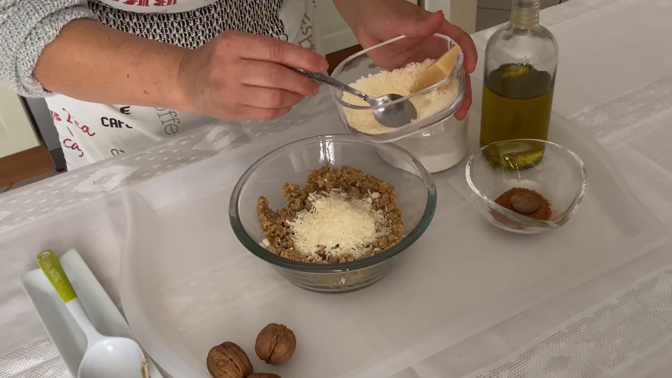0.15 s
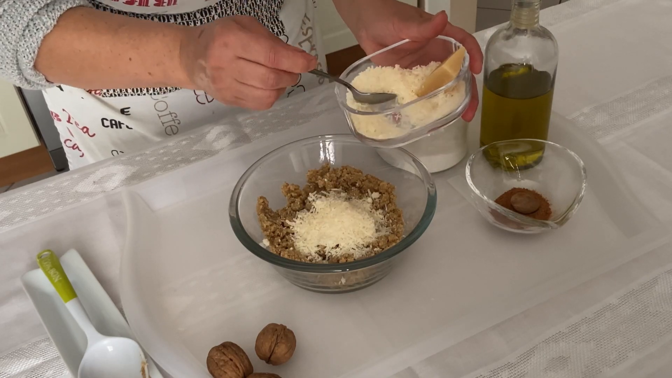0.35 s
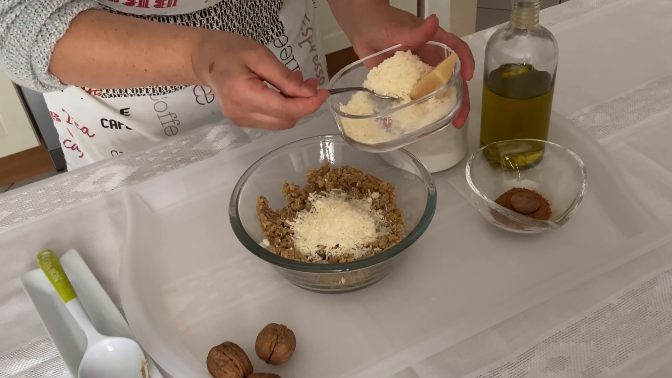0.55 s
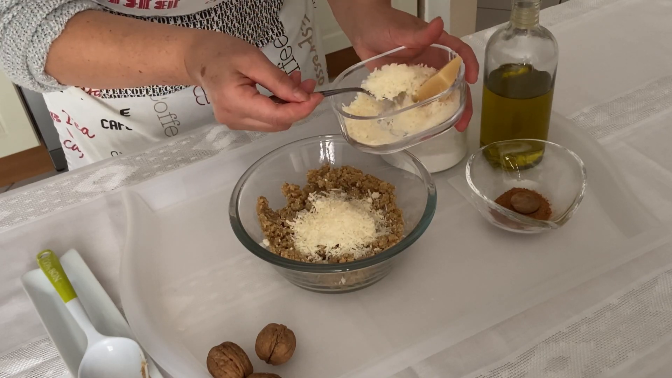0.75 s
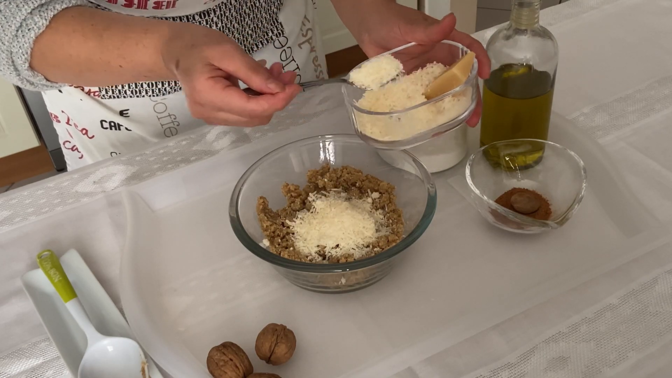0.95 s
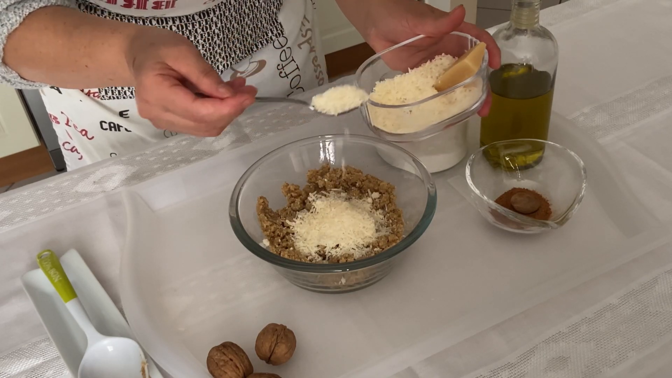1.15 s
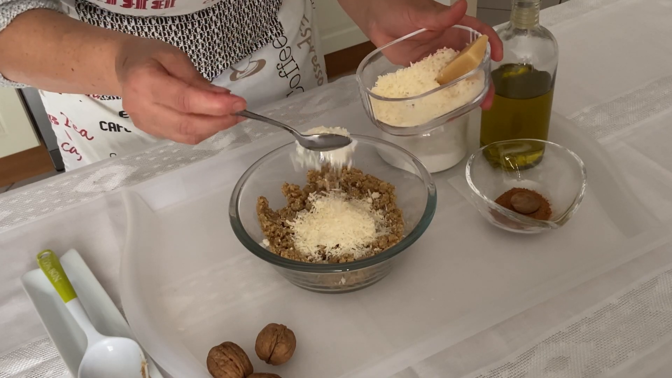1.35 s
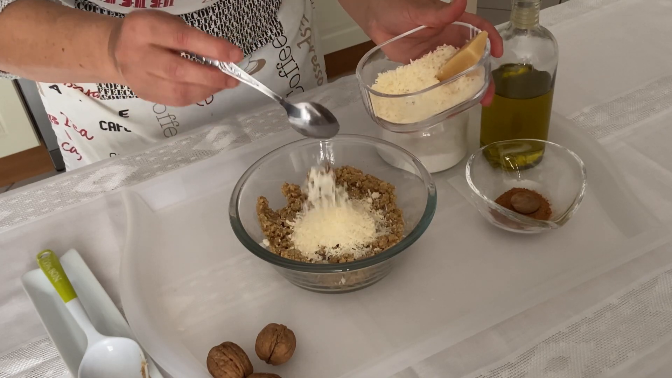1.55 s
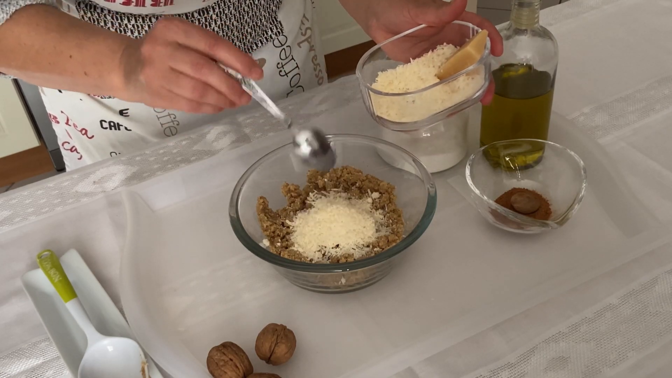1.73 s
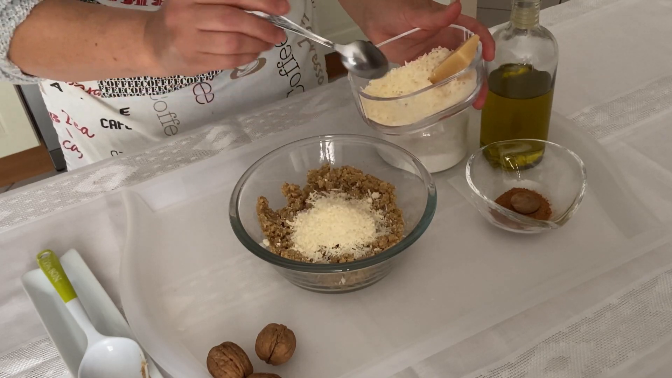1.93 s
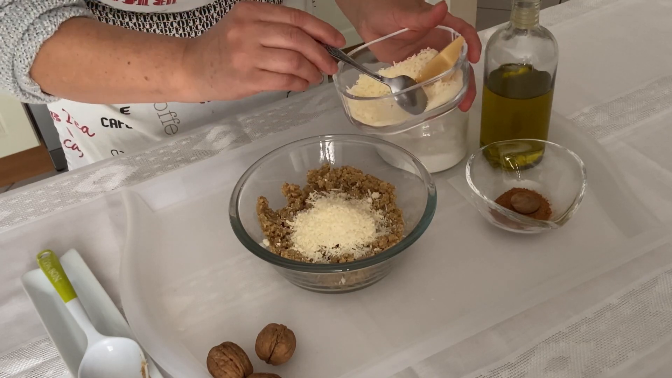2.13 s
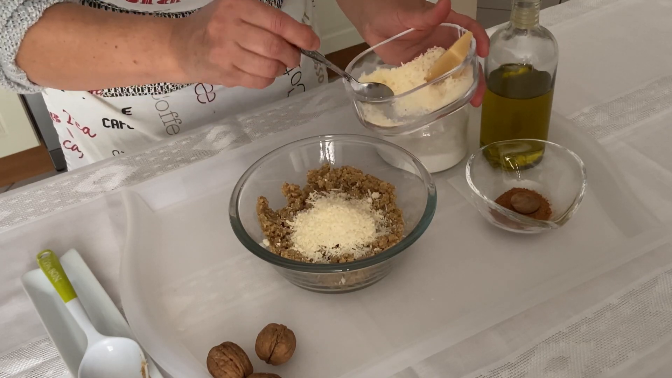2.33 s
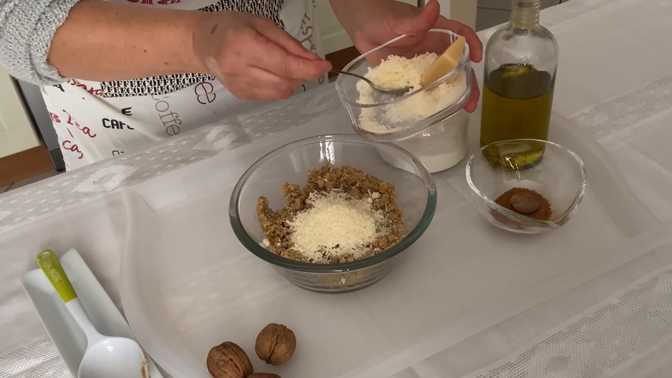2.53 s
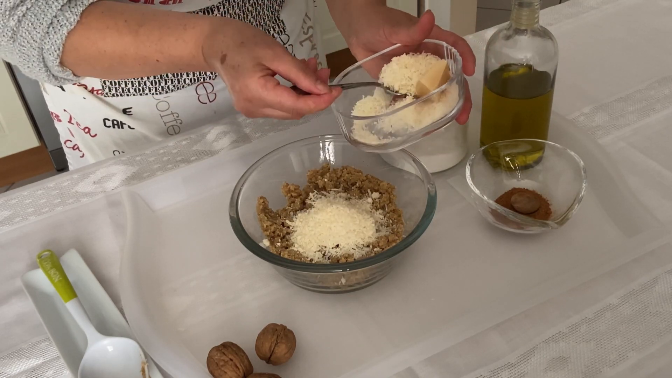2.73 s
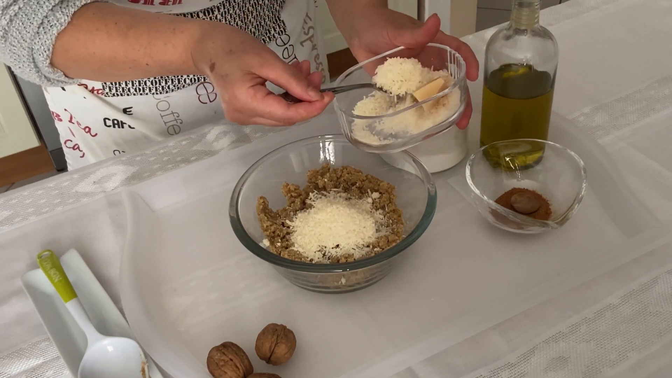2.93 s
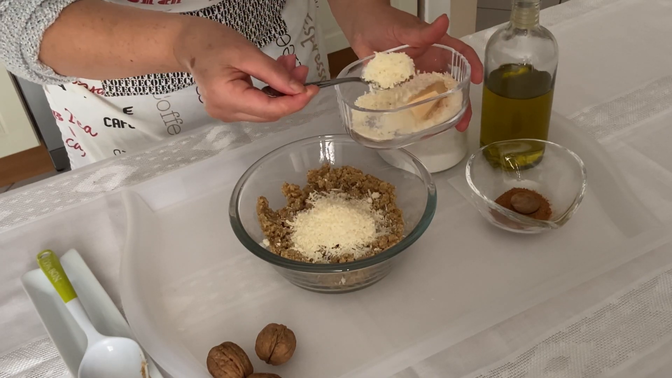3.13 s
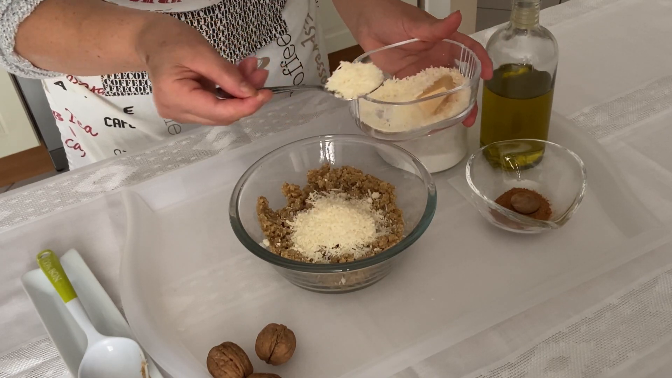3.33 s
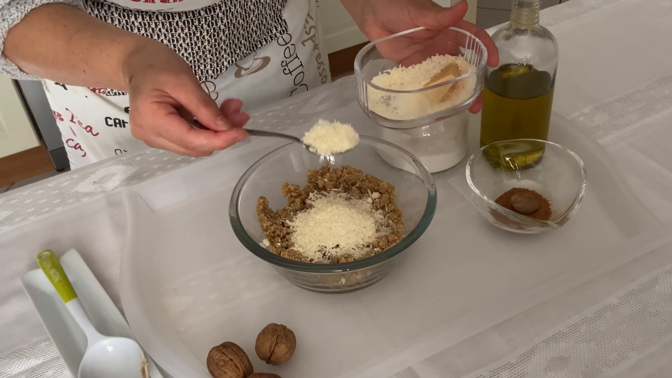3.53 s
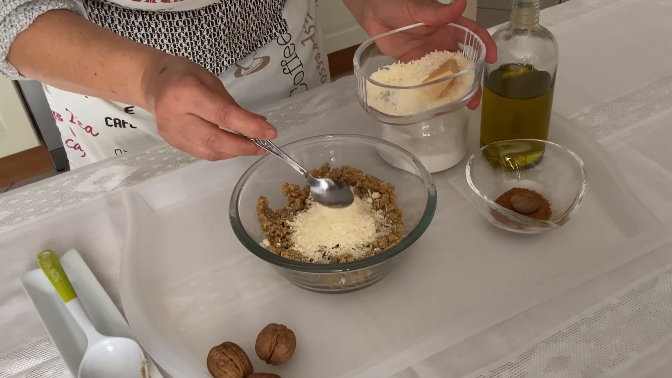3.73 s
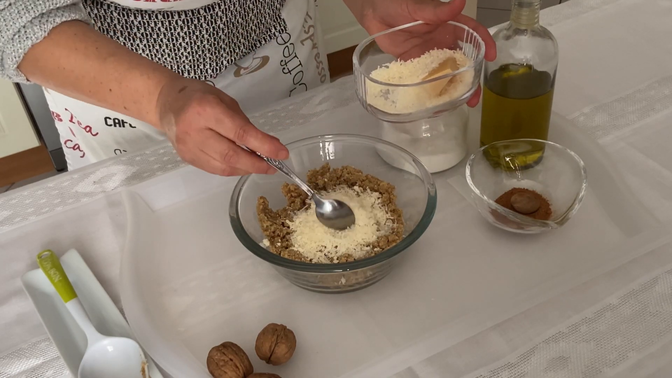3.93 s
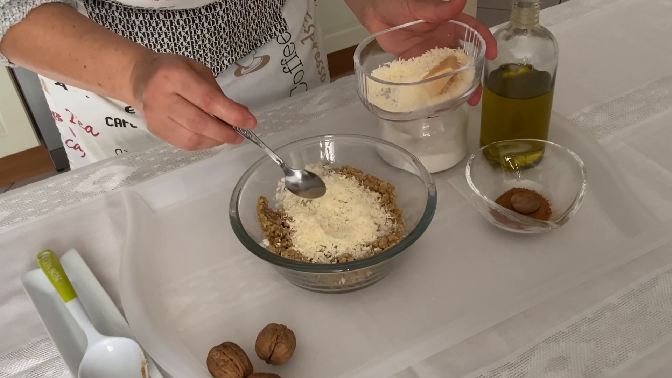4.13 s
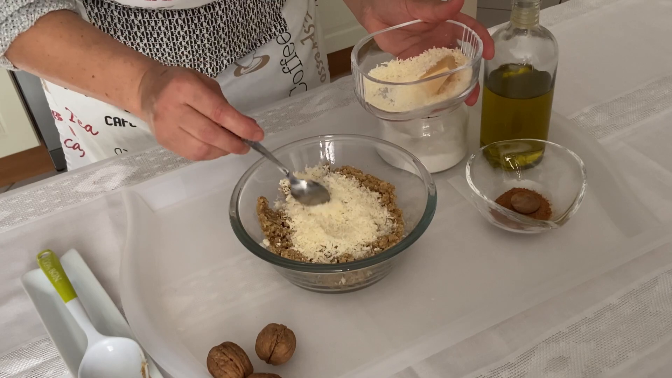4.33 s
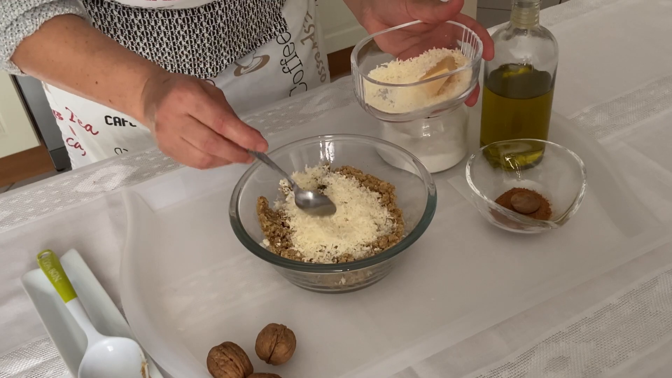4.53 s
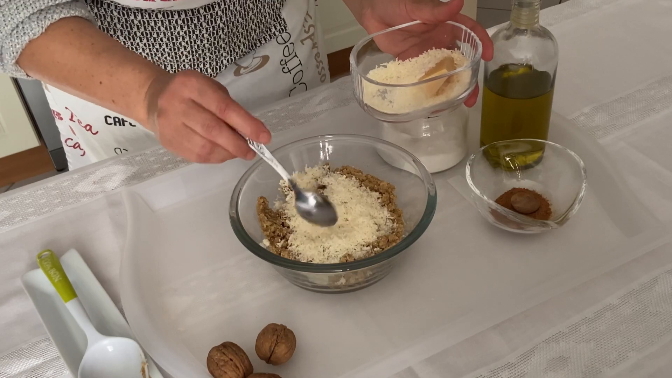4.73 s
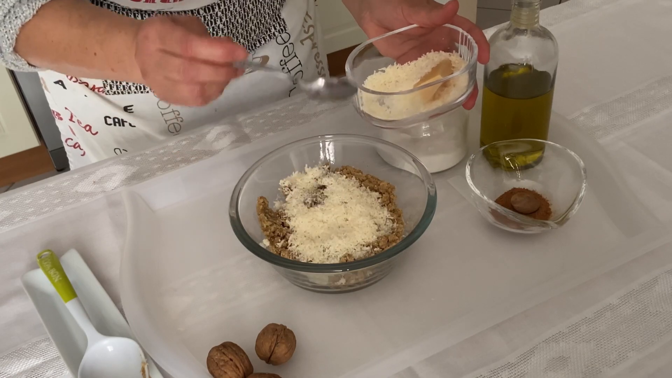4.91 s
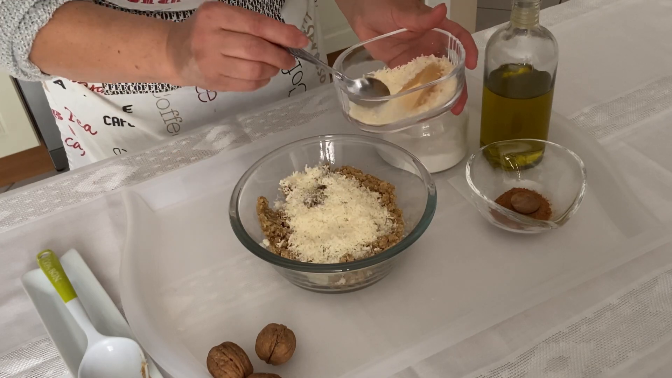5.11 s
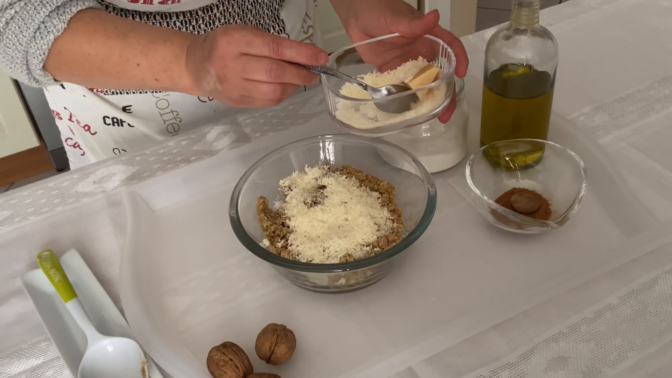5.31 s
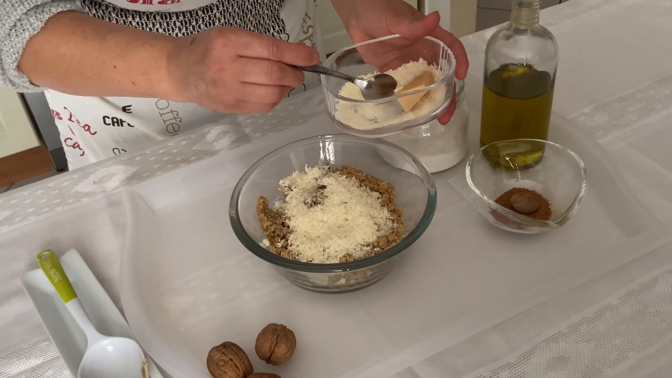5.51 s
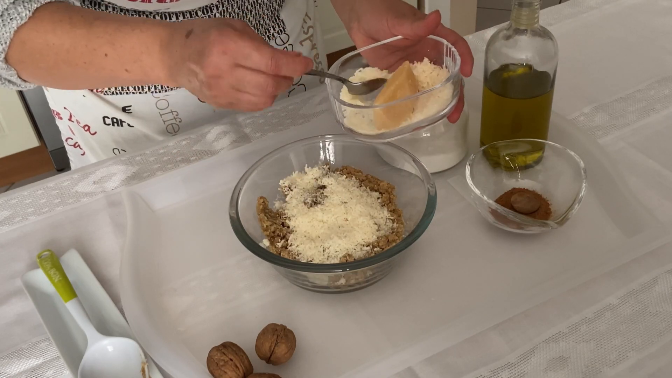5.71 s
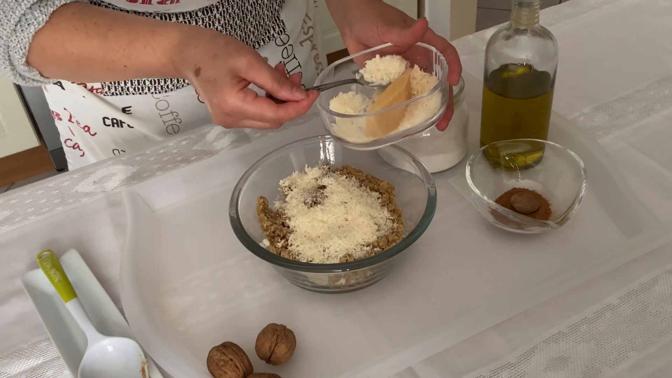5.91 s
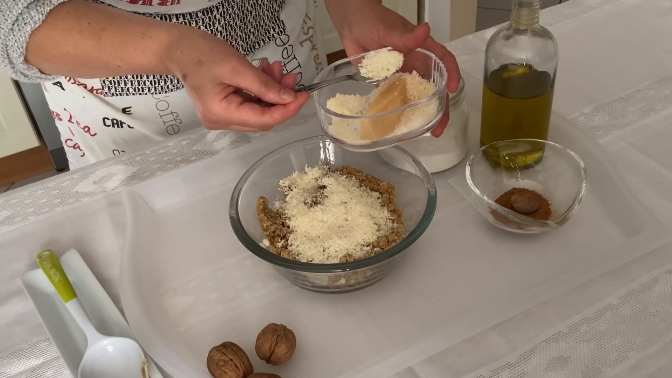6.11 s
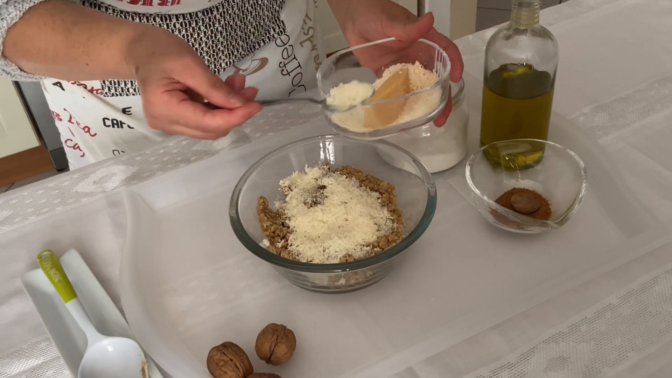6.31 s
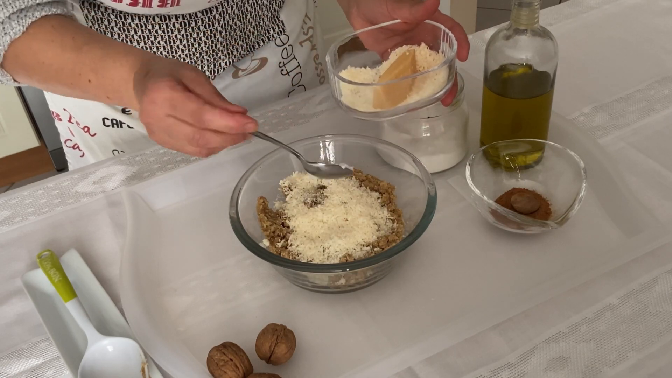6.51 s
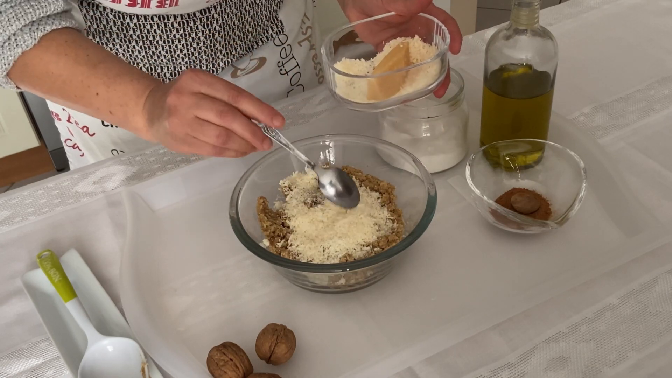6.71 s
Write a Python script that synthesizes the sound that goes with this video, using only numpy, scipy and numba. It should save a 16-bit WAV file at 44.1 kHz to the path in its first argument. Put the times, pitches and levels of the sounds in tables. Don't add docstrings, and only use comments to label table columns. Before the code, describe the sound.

Four uneven bursts of spoon-on-glass taps, short scrapes and bright clinks in a tiled kitchen, with low fridge hum and faint distant traffic.

```python
import sys
import numpy as np
from scipy import signal
from scipy.fft import rfft, irfft, next_fast_len
from scipy.io import wavfile
from scipy.ndimage import uniform_filter1d
from numba import njit

SR = 44100
rng = np.random.default_rng(int(sys.argv[2]) if len(sys.argv) > 2 else 0)


def field_ratio(decibels):
    return 10 ** (np.asarray(decibels, dtype=float) / 20)


def pcm_store(signal):
    levels = np.round(np.clip(np.atleast_2d(signal), -1, 1) * 32767)
    wavfile.write(sys.argv[1], SR, levels.astype(np.int16).T)


N = 297945

# (frequency [Hz], level [dB], t60 [s])
BOWL_MODES = [
    [(1870, -8, 0.043), (2210, 2.5, 0.022), (2440, 4, 0.019), (2900, -11, 0.085), (3230, 2.5, 0.011),
     (4117, 3.5, 0.055), (4310, 4, 0.033), (6250, -3.5, 0.037), (6530, -9, 0.037), (6605, 4.5, 0.012)],
    [(1926, -20.5, 0.073), (2234, -7, 0.11), (2306, 0, 0.028), (2370, -18.5, 0.018), (2430, -7, 0.028),
     (4110, -0.5, 0.04), (4260, 0, 0.039), (5970, -15, 0.044), (6360, -7.5, 0.091), (6680, -0.5, 0.044)],
    [(2260, -22.5, 0.079), (2223, -6.5, 0.19), (2238, -13, .42), (2353, -5.5, 0.044), (2480, -10, 0.039),
     (4116, -1.5, 0.047), (4330, -4.5, 0.032), (5934, -13, 0.043), (6335, -8.5, 0.011), (6280, -1.5, 0.041)],
    [(1810, -14.5, 0.042), (2215, -5, 0.041), (2560, -9.5, 0.049), (2936, 0.5, 0.017), (3210, -3, 0.0086),
     (4290, -2, 0.07), (4360, 3, 0.031), (6030, -6.5, 0.031), (6360, -7, 0.074), (6670, -0.5, 0.024)],
]


def read(table, hz):
    f, v = np.transpose(table)
    return np.interp(np.log(np.maximum(hz, 1)), np.log(f), v)


def colour(x, gain):
    n = x.shape[-1]
    size = next_fast_len(n)
    f = np.arange(size // 2 + 1) * SR / size
    return irfft(rfft(x, size) * gain(f), size)[..., :n]


def unit(x):
    return x / np.sqrt(np.mean(x ** 2))


def walk(rate):
    k = int(SR / rate)
    held = np.repeat(rng.standard_normal(N // k + 1), k)
    return 1.3 * uniform_filter1d(uniform_filter1d(held, k), k)[:N]


def add(out, at, x):
    i = int(at * SR)
    out[i:i + len(x)] += x[:len(out) - i]


@njit
def hollow(x, hz, width):
    y, b, l = np.empty(len(x)), 0., 0.
    for i in range(len(x)):
        g, k = np.tan(np.pi * hz[i] / SR), width / hz[i]
        v = (b + g * (x[i] - l)) / (1 + g * (g + k))
        b, l, y[i] = 2 * v - b, l + 2 * g * v, k * v
    return y


def air():
    # (frequency [Hz], density [dB per Hz])
    tone = [(12, -41.5), (20, -20), (41, -5), (86, 0), (172, -8.5), (277, -8.5), (527, -17), (780, -16.5),
            (949, -15), (1030, -15.5), (2530, -23.5), (3250, -26.5), (3530, -34), (11100, -48.5),
            (16000, -60.5)]
    # (frequency [Hz], width [Hz], level [dB])
    fridge = [
        (100.97, 15, -77),
        (200.3, 30, -81),
        (786, 170, -72.5),
        (3140, 280, -88),
        (11000, 2500, -99),
    ]
    # (time [s], level [dB])
    street = [(0.0, -69.5), (1.3, -68.5), (1.49, -63.5), (1.8, -70), (2.29, -69), (3.91, -67),
              (4.21, -64.5), (4.85, -67), (5.02, -63.5), (5.96, -63.5), (6.3, -69.5), (6.75, -66)]
    # (frequency [Hz], likeness [0-1])
    likeness = [(60, 0.99), (130, 0.87), (290, 0.57), (640, 0.92), (1410, -1.4), (3100, 1), (6820, -0.047),
                (15000, 0.13)]
    # (frequency [Hz], left over right [dB])
    pan = [(60, 2.5), (110, 1), (200, 0.5), (380, 2.5), (700, 4), (1290, 1), (2380, 4.5), (4400, 5),
           (8120, -1), (15000, 3)]
    air_db, left_lag_s = -64, 0.00026
    rumble_share, drone_share = 0.77, 0.65

    size = next_fast_len(N)
    s, street_db = np.transpose(street)
    traffic_db = np.interp(np.arange(N) / SR, s, street_db - street_db.mean())
    pair = 0
    for lo in 15 * 2. ** np.arange(11):
        band = lambda f: field_ratio(read(tone, f)) * (f >= lo) * (f < 2 * lo)
        swell_db = traffic_db * (rumble_share * (lo < 100) + drone_share * (100 < lo < 400))
        wander_db = .3 * walk(1.2) + .8 * walk(13)
        noise = colour(rng.standard_normal((2, size)), band)[:, :N]
        pair = pair + field_ratio(swell_db + wander_db) * noise
    pair = pair * field_ratio(air_db + 0.5) / np.std(pair)
    for hz, width, db in fridge:
        hump = lambda f: 1 / (1 + (2 * (f - hz) / width) ** 4)
        pair = pair + field_ratio(db) * unit(colour(rng.standard_normal((2, size)), hump))[:, :N]

    like = lambda f: np.clip(read(likeness, f), 0, 1)
    left_gain = lambda f: field_ratio(read(pan, f) / 2)
    right_gain = lambda f: field_ratio(-read(pan, f) / 2)
    left = colour(pair[0], lambda f: left_gain(f) * np.exp(-2j * np.pi * f * left_lag_s))
    shared = colour(pair[0], lambda f: like(f) * right_gain(f))
    own = colour(pair[1], lambda f: np.sqrt(1 - like(f) ** 2) * right_gain(f))
    return np.array([left, shared + own])


def walls():
    # (frequency [Hz], t60 [s], level [dB])
    decay = np.array([(500, 0.63, 0.5), (1200, .7, -2), (2193, 0.56, -3.5), (4200, 0.54, -0.5),
                      (6300, 0.5, -4), (12000, 0.32, -2)])
    wall_db, like = -6, 0.21
    t = np.arange(SR) / SR
    common, left, right = rng.standard_normal((3, SR))
    noise = np.sqrt(like) * common + np.sqrt(1 - like) * np.array([left, right])
    echo = 0
    for lo in 100 * 2. ** np.arange(0, 8, .5):
        band = colour(noise, lambda f: (f >= lo) * (f < lo * np.sqrt(2)))
        t60, db = read(decay[:, [0, 1]], lo), read(decay[:, [0, 2]], lo)
        echo = echo + field_ratio(db) * band * np.exp(-np.log(1000) * t / t60)
    echo = echo * np.clip((t - .004) / 0.0046, 0, 1)
    return field_ratio(wall_db) * echo / np.sqrt(np.sum(echo ** 2) / 2)


def thumps():
    # (time [s], level [dB], frequency [Hz], length [s])
    bumps = [
        (1.391, -46.5, 72.5, 0.031),
        (1.562, -54, 105, 0.065),
        (5.227, -43.5, 167, 0.088),
        (5.211, -56, 303, 0.17),
        (5.874, -50, 90.5, 0.093),
        (5.96, -51, 90, 0.06),
    ]
    out = np.zeros(N)
    for s, db, hz, length in bumps:
        n = int(length * SR)
        bump = colour(rng.standard_normal(n), lambda f: 1 / (1 + ((f - hz) / (0.99 * hz)) ** 2))
        add(out, s, field_ratio(db - 10.5) * unit(bump) * np.hanning(n))
    return out


def sift():
    # (time [s], level [dB])
    falls = [
        (4.862, -83),
        (5.0, -81),
        (6.362, -80.5),
        (6.638, -75),
    ]
    # (frequency [Hz], density [dB per Hz])
    tone = [(1180, -32), (2000, -7), (7310, -22), (8930, -17.5), (10800, -24.5), (13200, -29.5),
            (14500, -24.5), (16000, -37.5)]
    rise_db_s, fall_db_s = 136, 259
    t = np.arange(N) / SR
    flow = 0
    for s, db in falls:
        slope = np.where(t < s, rise_db_s, -fall_db_s)
        flow = flow + field_ratio(db + slope * (t - s))
    grains = rng.standard_normal(N) * field_ratio(2.7 * rng.exponential(size=N))
    hiss = colour(grains, lambda f: field_ratio(read(tone, f)) * (f > 2000))
    return unit(hiss) * flow * field_ratio(5.0)


def ring(bowl, family_db):
    # (frequency [Hz], level [dB], t60 [s])
    spoon = [(5600, -15.5, 0.03), (7730, -1.5, 0.056), (8620, -7, 0.07), (10070, -11, 0.055),
             (10360, -5, 0.02), (10800, -17.5, 0.035), (11100, -21.5, 0.034), (11725, -12, 0.022),
             (12900, -16.5, 0.047), (11800, -19, 0.082), (14060, -17.5, .05), (14210, -12, .05)]
    hz, db, t60 = np.transpose(bowl + spoon)
    family = np.r_[np.searchsorted((3600, 5600), hz[:len(bowl)]), np.full(len(spoon), 3)]
    chance = rng.standard_normal((3, len(hz)))
    gain = field_ratio(db + np.asarray(family_db)[family] + 1.5 * chance[0])
    t = np.arange(SR // 3)[:, None] / SR
    hz = hz * (1 + .001 * chance[2])
    swing = np.exp(-np.log(1000) * t / t60) * np.sin(2 * np.pi * hz * t + 0.63 * chance[1])
    return (swing @ gain) * (1 - np.exp(-t[:, 0] / .0007))


def drags():
    # (time [s], length [s], pressure [dB], air gap against pressure [dB], gap pitch [Hz])
    strokes = [
        [(0.335, 0.078, -53, -8, 2920), (0.418, 0.073, -50, -1, 2290), (0.487, 0.041, -52.5, 4.5, 2440),
         (0.535, 0.027, -59, 10.5, 2290)],
        [(5.655, 0.042, -43.5, -16, 2900), (5.705, .06, -55, -6, 2320), (5.76, 0.056, -55, 1, 2510),
         (5.815, .095, -58.5, 11.5, 2480), (5.915, 0.033, -66.5, 2.5, 2350)],
    ]
    grip_s, lift_s, fade_db = .016, 0.0038, -7.5
    sag_hz_per_s = -1200
    bright_db, grit_db, grit_width_hz = -7.5, -8, 2400.
    out, t = np.zeros(N), np.arange(SR // 5) / SR
    for bowl, rows in zip((BOWL_MODES[0], BOWL_MODES[-1]), strokes):
        low_ring = ring(bowl, [1.5, -5.5, -99, -99])
        high_ring = ring(bowl, [-99, -99, -3.5, -9])
        for s, length, db, gap_db, gap_hz in rows:
            bite = np.clip(t / grip_s, 0, 1)
            lift = np.clip(1 + (length - t) / lift_s, 0, 1)
            stroke = field_ratio(db + fade_db * t / length) * bite * lift
            slips = unit((rng.random(len(t)) < 5000 / SR) * rng.standard_normal(len(t)))
            low = unit(signal.fftconvolve(slips, low_ring)[:len(t)])
            high = unit(signal.fftconvolve(slips, high_ring)[:len(t)])
            hz = gap_hz + sag_hz_per_s * t
            gap = unit(hollow(hollow(slips, hz, 200.), hz, 200.))
            grit = unit(hollow(hollow(slips, 0.61 * hz, grit_width_hz), 0.61 * hz, grit_width_hz))
            hiss = field_ratio(gap_db - 1) * (gap + field_ratio(grit_db) * grit)
            add(out, s, stroke * (low + field_ratio(bright_db) * high + hiss))
    return out


def contact_tone(ticks):
    # (frequency [Hz], density [dB per Hz])
    tone = [(450, -32), (800, -1), (1300, -1), (2500, 0.5), (5500, -9.5), (8000, -14), (12000, -14.5),
            (15000, -26.5), (16500, -61.5)]
    return colour(ticks, lambda f: field_ratio(read(tone, f)))


def clack(db):
    t = np.arange(1024) / SR
    return field_ratio(db + 8.0) * rng.standard_normal(len(t)) * np.exp(-t / 0.0038)


def touches():
    # (time [s], level [dB], frequency [Hz], width [Hz])
    brushes = [
        (0.417, -34.5, 2600, 2000),
        (2.122, -60.5, 2600, 3000),
        (2.192, -44.5, 2840, 351),
        (2.331, -19.5, 2598, 701.5),
        (2.217, -54.5, 5000, 6000),
        (5.513, -49.5, 5100, 8000),
        (5.565, -46, 4000, 6000),
        (5.934, -48, 3000, 4000),
    ]
    out, t = np.zeros(N), np.arange(1024) / SR
    for s, db, hz, width in brushes:
        brush = hollow(rng.standard_normal(len(t)), np.full(len(t), 1. * hz), 1. * width)
        add(out, s, field_ratio(db) * brush * np.exp(-t / 0.007))
    return contact_tone(out)


def more_clacks():
    # (time [s], level [dB])
    extra_clacks = [
        (2.23, -42.5),
        (2.293, -35.5),
        (2.358, -47),
        (2.377, -40),
        (5.037, -25.5),
        (5.061, -27.5),
        (5.176, -28),
        (5.639, -39),
    ]
    out = np.zeros(N)
    for s, db in extra_clacks:
        add(out, s + .0012, clack(db))
    return contact_tone(out)


def knocks():
    # (time [s], blow [dB], then against the blow: second ring [dB], third ring [dB], spoon ring [dB])
    scoops = [
        [(0.314, -34.5, -10.5, -6, -9), (0.417, -45, -30, -30, -9.5)],
        [(2.229, -54.5, 0, -2, 5), (2.276, -14.5, -17, -10, -24), (2.284, -21, -4, -11, -10),
         (2.293, -37.5, -11.5, -3.5, -14), (2.306, -38.5, -8, -11, -15.5), (2.33, -36.5, -2, -11, -17),
         (2.35, -39.5, -10.5, -14, -5), (2.358, -42, -4.5, -5, -14), (2.377, -39, -5, -2.5, 4),
         (2.449, -50, 1, -1, -5)],
        [(5.037, -14.5, -6, -14, -24), (5.061, -20.5, -26, -20, -30), (5.077, -20, -27, -20, -37.5),
         (5.115, -34.5, -1, -10, -15), (5.15, -23.5, -3.5, 5, -13), (5.176, -40.5, -2.5, 20, 23),
         (5.512, -62, -10, 1, -1)],
        [(5.571, -50, -15, -14, -5.5), (5.639, -30, -6.5, -9.5, -14.5)],
    ]
    clack_db, mute_db = -27, -6
    clacks, rings = np.zeros(N), np.zeros(N)
    for bowl, rows in zip(BOWL_MODES, scoops):
        next_rows = rows[1:] + [(N,)]
        for (s, blow_db, *upper_db), (after, *_) in zip(rows, next_rows):
            add(clacks, s + 0.0016, clack(blow_db + clack_db))
            swing = ring(bowl, blow_db + np.r_[0, upper_db])
            stilled = np.clip((np.arange(len(swing)) / SR - after + s) / .002, 0, 1)
            add(rings, s + 0.00064, field_ratio(1.5 + mute_db * stilled) * swing)
    return contact_tone(clacks) + rings


def two_ports(near):
    # (frequency [Hz], left over right [dB])
    level = [(60, 1.0), (110, 2.0), (200, 0.5), (380, 3), (700, 0.5), (1290, -1.5), (2380, 2.5),
             (4400, 5.5), (8120, 2), (15000, -0.5)]
    # (frequency [Hz], phase [rad])
    phase = [(0, 0), (690, -0.3), (2240, 1.0), (4310, 0.0), (5250, 1.0), (5940, -0.1), (6890, 0.3),
             (9560, -3.9), (10800, -5.9), (11500, -6.5), (12900, -9.3), (13800, -9.5), (15000, -12.6),
             (15900, -12.6)]
    port = lambda f: field_ratio(read(level, f) / 2) * np.exp(.5j * read(phase, f))
    return np.array([colour(near, port), colour(near, lambda f: 1 / port(f))])


def scene():
    echo, room = walls(), air()
    bowl_cut_hz = 400
    bowl = drags() + sift() + touches() + more_clacks() + knocks()
    near = colour(bowl, lambda f: f ** 6 / (f ** 6 + bowl_cut_hz ** 6))
    reflected = signal.fftconvolve(near[None], echo, axes=1)[:, :N]
    return two_ports(near) + reflected + thumps() + room


def roll_off(x):
    return signal.sosfilt(signal.butter(12, 16390, fs=SR, output="sos"), x)


def record(dry):
    # (frequency [Hz], width [Hz], depth [dB])
    notches = [
        (8945, 290, -24),
        (13600, 450, -13.5),
        (16300, 900, -14),
    ]
    bass_cut_hz = 29
    dips = lambda f: field_ratio(sum(db * np.exp(-((f - hz) / width) ** 2) for hz, width, db in notches))
    heard = colour(dry, lambda f: dips(f) * f ** 4 / (f ** 4 + bass_cut_hz ** 4))
    return roll_off(heard)


dry = scene()
out = record(dry)
pcm_store(out)
```